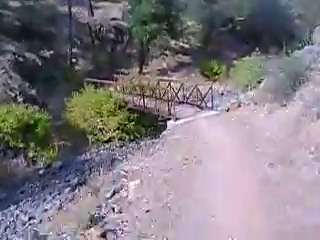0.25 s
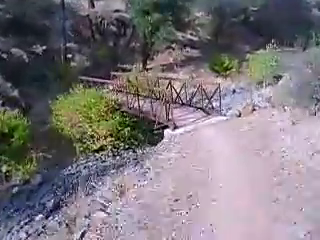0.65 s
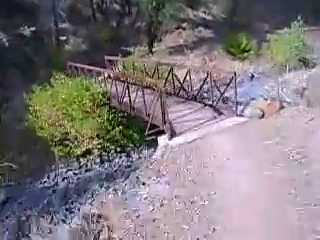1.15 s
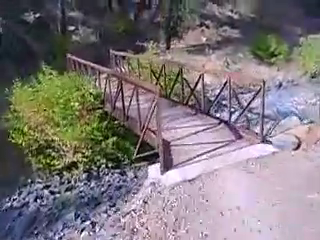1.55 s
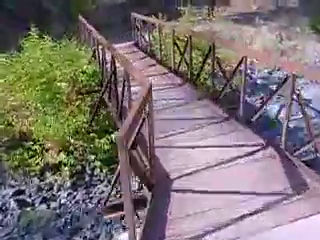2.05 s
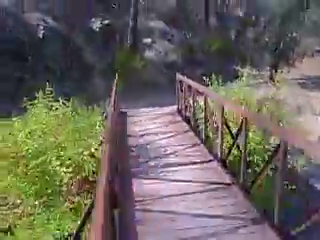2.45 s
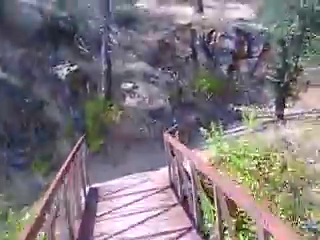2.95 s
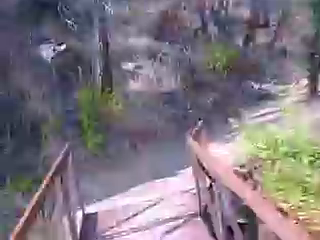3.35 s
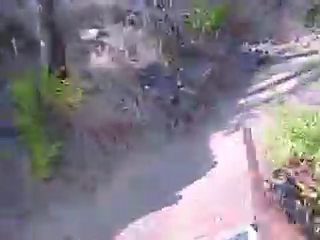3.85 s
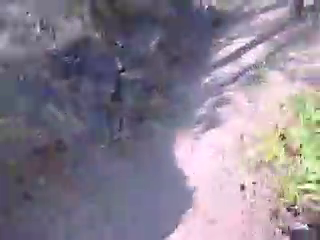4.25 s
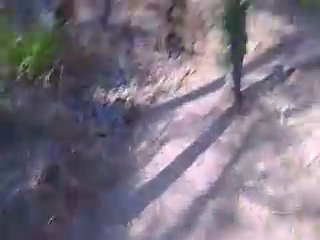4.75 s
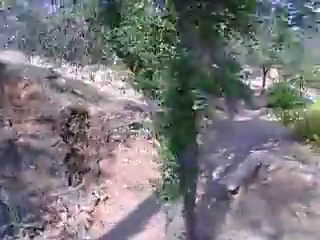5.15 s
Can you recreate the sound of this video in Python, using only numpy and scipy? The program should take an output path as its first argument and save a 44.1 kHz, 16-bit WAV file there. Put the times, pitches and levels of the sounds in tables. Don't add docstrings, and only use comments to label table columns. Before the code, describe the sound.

A bike rolls down a gravel trail with a brief brake moan, booms and rattles over a plank footbridge, then returns to dirt, all in buffeting wind.

```python
import sys
import numpy as np
from scipy import signal
from scipy.fft import rfft, irfft, next_fast_len
from scipy.io import wavfile
from scipy.ndimage import uniform_filter1d

SR = 44100
rng = np.random.default_rng(int(sys.argv[2]) if len(sys.argv) > 2 else 0)


def ratio(d):
    e = np.asarray(d, float) / 20
    return 10 ** e


def file_out(sig):
    cols = np.atleast_2d(sig).T
    lim = np.clip(cols, -1, 1)
    pcm = np.round(lim * 32767).astype(np.int16)
    wavfile.write(sys.argv[1], SR, pcm)


N = 238882

# t/s, frame shaking level/dB, tyre load level/dB, air at the port level/dB
RIDE = [(0.0, -24.5, -26.5, -25), (0.36, -25.5, -26.5, -25), (1.18, -30, -25.5, -26.5),
        (1.61, -29.5, -26.5, -24.5), (1.95, -27, -21.5, -24), (2.11, -23.5, -20, -25),
        (2.37, -22, -21, -26), (2.61, -15, -19, -19), (2.76, -14, -19, -23), (2.99, -20, -19.5, -18),
        (3.21, -15.5, -23, -25), (3.48, -15.5, -20.5, -16), (4.03, -14.5, -16, -21.5),
        (4.16, -19, -17.5, -23.5), (4.54, -18.5, -20.5, -26.5), (4.8, -18, -21, -24.5),
        (5.19, -26, -21.5, -25.5), (5.42, -20.5, -24.5, -27)]
# t/s, swell level/dB
RUTS = [(.26, 1.5), (.5, 3), (.59, 3), (.72, 0), (.95, -1.5), (1.09, 4.5), (1.3, 3.5), (1.7, 6.5),
        (1.98, 2), (2.12, 1), (2.63, 3), (2.73, 0), (2.86, 7.5), (3.07, 1.5), (3.18, 2), (3.36, -0.5),
        (3.5, 6.5), (3.73, -1), (3.83, -0.5), (3.94, 0.5), (4.08, 5.5), (4.17, 4.5), (4.29, 1), (4.02, -2),
        (4.38, 5.5), (4.53, 1), (4.66, 5), (4.79, 1.5), (5.28, 3), (5.34, 3), (2.05, 0.5)]
# t/s, peak level/dB, ring f/Hz
STONE_BUMPS = [(0.49, -11, 313), (0.74, -25, 651), (1.088, -8, 457), (1.21, -5.5, 305), (1.445, -14, 545),
               (1.555, -15.5, 358), (1.673, -7.5, 290), (1.922, -12.5, 328), (1.978, -3, 371),
               (2.244, -15.5, 358), (2.358, 0.5, 300), (4.39, 0.5, 383), (4.985, -4.5, 322),
               (5.286, -5, 450)]
# t/s, splatter level/dB
HARD_BLOWS = [(2.5829, -45), (2.6178, -30), (2.636, -31), (2.7061, -39), (2.7311, -35), (2.7358, -33),
              (2.8144, -45), (2.8568, -33), (2.8655, -30), (2.8705, -31), (2.886, -32), (3.0655, -30),
              (3.0678, -28), (3.1781, -39), (3.1888, -33), (3.2369, -27), (3.254, -37), (3.4549, -33),
              (3.5153, -37), (3.7109, -43), (3.7336, -43), (3.7607, -29), (3.9423, -33), (3.9787, -43),
              (4.0271, -31), (4.0445, -42), (4.091, -30), (4.1444, -36), (4.1783, -42), (4.1935, -42),
              (4.6402, -33),
    (4.6836, -44),
    (4.7934, -32),
]
# t/s, level/dB, f/Hz, t60/s
CHAIN_SLAPS = [(2.632, -5, 385, 0.11), (2.648, -10.5, 540, .09), (2.457, -10.5, 1205, .07),
               (3.512, -13, 3100, .04), (2.924, -12.5, 2250, 0.024), (3.063, -8.5, 2024, 0.079),
               (3.068, -9, 1320, 0.099), (3.077, -9.5, 1560, 0.057), (3.085, -6, 920, 0.047),
               (3.235, -11.5, 1596, 0.067), (3.234, -18, 2170, 0.041), (3.3, -8, 123, 0.18),
               (3.48, -9, 121.6, 0.12)]
# t/s, level/dB, rise/s, t60/s
DECK_DROPS = [
    (2.44, 0.5, .002, 0.17),
    (2.639, -2, 0.0068, 0.2),
    (2.851, -13.5, 0.0073, 0.1),
]
# f/Hz, width/Hz, level/dB
DECK_MODES = [(348.2, 70, 0.5), (489, 92, -3), (667, 110, -4), (1210, 170, -6), (1994, 120, -20)]
# t/s, peak level/dB, ring f/Hz
FRAME_STONES = [(0.0606, -14.5, 1835), (0.095, -19, 1520), (0.717, -17.5, 1640), (0.744, -18.5, 1600),
                (0.802, -20.5, 2110), (0.822, -18.5, 2620), (.8498, -13, 1811), (.8839, -34, 1480),
                (1.0135, -24.5, 2120), (1.0527, -22, 2680), (1.284, -17.5, 1900), (1.3703, -28, 1680),
                (1.4755, -14, 1520), (1.511, -25, 1600), (1.5676, -20.5, 1640), (1.6518, -24, 1820),
                (1.7157, -16, 1900), (2.112, -15.5, 3270), (2.195, -13.5, 1870), (2.247, -23, 1500),
                (2.269, -19.5, 1580), (2.296, -13, 1810), (2.362, -13.5, 1830), (4.808, -13, 1970),
                (4.861, -17, 1340), (4.986, -15, 1470), (5.0972, -17.5, 1670), (5.2736, -16, 1450),
                (5.3647, -13.5, 1405)]
# t/s, peak level/dB, ring f/Hz
HOUSING_GRIT = [(.496, -22, 2930), (0.9524, -24, 3810), (1.1442, -21.5, 3170), (1.2374, -21.5, 2710),
                (1.5845, -22, 3640), (1.961, -22, 2880), (2.143, -27, 3060), (3.7966, -19, 3100),
                (3.863, -29, 3150), (4.108, -13.5, 3090), (4.561, -13, 4100), (4.6918, -16.5, 2830),
                (5.035, -24, 2500)]
# t/s, peak level/dB, ring f/Hz, crack re peak level/dB
CHAIN_KNOCKS = [(2.616, -18, 1406, -2), (2.638, -13, 1490, -1.5), (2.793, -30, 1410, -8),
                (2.824, -6.5, 1756, -6), (2.8485, -10, 1610, -11), (2.9238, -7.5, 2120, -10),
                (3.0649, -7, 1890, -13), (3.1741, -4, 1460, -15.5), (3.232, -2, 1602, -15),
                (3.283, -9, 1810, -5.5), (3.315, -31, 1500, -3), (3.4257, -15, 1640, -13),
                (3.4483, -4, 1440, -24), (3.5126, -21, 1405, 2), (3.5666, -19, 1590, -1),
                (3.6025, -20.5, 1460, 0.5), (3.712, -8, 1500, -6), (3.7606, -1.5, 1464, -12),
                (3.83, -6.5, 1522, -9), (3.9, -18, 1860, -5), (3.943, -20.5, 1570, 2.5),
                (3.9815, -9.5, 1650, -8.5), (4.168, -15.5, 1460, -13), (4.319, -14, 1760, -18),
                (4.35, -14, 1360, -5), (4.3895, -11.5, 1390, -8), (4.459, -21, 1590, 1),
                (4.5386, -19, 1790, 1), (4.6402, -12, 1906, -13.5), (4.6922, -18, 1335, -4)]
# t/s, length/s, level/dB
BRAKE_GRIPS = [
    (.16, .11, -19),
    (.302, .09, -21.5),
    (.472, .045, -23),
    (.585, .065, -24.5),
]
# t/s, swell level/dB
GUSTS = [(.06, 0), (.27, 4), (.51, 6.5), (.83, 3), (.96, 5.5), (1.18, 5), (1.31, 1), (1.5, 1.5),
         (1.72, 3.5), (2.0, 2), (2.21, 4), (2.5, 1.5), (2.79, 4.5), (2.88, 2), (3.07, -1.5), (3.23, 2),
         (3.38, 1.5), (3.66, -2), (4.05, 0.5), (4.22, 3.5), (4.67, 3), (4.8, -1), (5.05, 2), (5.34, 3.5)]
# f/Hz, level/dB per Hz
TYRE_SPECTRUM = [(110, -20), (170, -4.5), (260, -0.5), (360, -1), (480, -5), (650, -8.5), (900, -19.5)]
# f/Hz, level/dB per Hz
TREAD_SPECTRUM = [(450, -4.5), (650, -1.5), (850, 2), (1000, 0.5), (1250, -7), (1700, -35.5), (2300, -20)]
# f/Hz, level/dB per Hz
RATTLE_SPECTRUM = [(1000, -11.5), (1500, 4), (2100, -2.5), (2900, -7.5), (4000, -15.5), (5500, -16)]
# f/Hz, level/dB per Hz
GRAVEL_SPECTRUM = [(1500, -10.5), (2500, -1), (4000, -1), (5500, -1.5)]
# f/Hz, level/dB per Hz
WIND_SPECTRUM = [(45, -20.5), (70, -5.5), (100, -2.5), (130, -3), (165, -4.5), (230, -13), (400, -34)]
# f/Hz, level/dB per Hz
BUFFET_SPECTRUM = [(12, -24), (22, -4), (40, -4), (60, -0.5), (85, -7.5), (120, -23.5)]

CRUISE_DB, TYRE_DB, TREAD_DB, RATTLE_DB, CRACKLE_DB = -22, 2.5, -23, -32.5, -38.5
TREAD_FOLLOWS, RATTLE_FOLLOWS, TYRE_FEELS_RUT, RATTLE_FEELS_RUT = 1.13, 0.87, 0.52, 0.81
RUT_RISE_S, RUT_FALL_S = 0.01, 0.032
BLOW_S, BLOW_LONGER_S_PER_DB = .00018, .0000042
STONE_T60_S, CHAIN_T60_S, GRIT_T60_S, STONE_CRACK_DB, GRIT_CRACK_DB = 0.032, .033, 0.025, -6, -4
BRAKE_HZ, SETTLE_HZ, SETTLE_S = 889, 799, 0.27
GRIP_DB_PER_S, SLIP_DB_PER_S, LET_GO_DB_PER_S = 1200, 58.5, 701
UPPER_HZ, UPPER_DB, UPPER_FROM_S, UPPER_LENGTH_S = 1075, -28, .18, 0.144
WIND_DB, BUFFET_DB, GUST_S = -1.5, -6.5, .045
PAD_TOP, SENSOR_TOP, FINAL_TOP = .61, .695, .712
BAND_HZ, STUMBLE, DEAD_ZONE = 5470, .42, .2


def tyres(load_db, rut_db):
    drumming = coloured(grains(500, 10.5, 0.8, 0.48, 17), TYRE_SPECTRUM)
    return ratio(TYRE_DB + load_db + TYRE_FEELS_RUT * rut_db) * drumming


def tread_and_frame(rough_db, rut_db):
    jolts = grains(900, 3.77, 0.51, 0.61, 40)
    tread = ratio(TREAD_DB + TREAD_FOLLOWS * rough_db + rut_db) * coloured(jolts, TREAD_SPECTRUM)
    rattle = coloured(jolts * ratio(2.0 * drift(55)), RATTLE_SPECTRUM)
    return tread + ratio(RATTLE_DB + RATTLE_FOLLOWS * rough_db + RATTLE_FEELS_RUT * rut_db) * rattle


def gravel(rough_db, rut_db):
    snaps = coloured(grains(400, 3.0, .05, 3.4, 25), GRAVEL_SPECTRUM)
    return ratio(CRACKLE_DB + RATTLE_FOLLOWS * rough_db + RATTLE_FEELS_RUT * rut_db) * snaps


def thuds(shaking):
    out = shaking.copy()
    for s, db, hz in STONE_BUMPS:
        ping(out, s, db - 4.5, hz, 9.0 / hz)
    for s, db, hz, t60 in CHAIN_SLAPS:
        ping(out, s, db, hz, t60)
    near = np.arange(-18, 19)
    fade = np.hanning(len(near)) ** .2
    for s, splatter_db in HARD_BLOWS:
        at = 4 * round((s + .0006) * SR / 4)
        half = SR * (BLOW_S - BLOW_LONGER_S_PER_DB * (splatter_db + 27))
        swing = np.sign(out[at]) * np.cos(np.pi / 2 * np.clip(near / half, -1, 1)) ** 2
        out[at + near] += fade * (swing - out[at + near])
    return out


def deck_drops():
    t, shake = np.arange(N) / SR, 0
    for s, db, rise, t60 in DECK_DROPS:
        late = np.maximum(t - s, 0)
        decay_db = 60 * np.maximum(late - rise - .012, 0) / t60
        shake = shake + ratio(db - decay_db) * np.minimum(late / rise, 1)
    white, deck = rng.standard_normal(N), 0
    for k, (hz, width, db) in enumerate(DECK_MODES):
        r = np.exp(-np.pi * width / SR)
        poles = [1, -2 * r * np.cos(2 * np.pi * hz / SR), r * r]
        mode = rms_one(signal.lfilter([1, 0, -1], poles, white))
        deck = deck + (-1) ** k * ratio(db) * mode
    return shake * rms_one(deck)


def ticks():
    strikes = [(*row, STONE_T60_S, STONE_CRACK_DB) for row in FRAME_STONES]
    strikes += [(*row, GRIT_T60_S, GRIT_CRACK_DB) for row in HOUSING_GRIT]
    strikes += [(s, db, hz, CHAIN_T60_S, crack_db) for s, db, hz, crack_db in CHAIN_KNOCKS]
    rings, cracks = np.zeros(N), np.zeros(N)
    for s, db, hz, t60, crack_db in strikes:
        ping(rings, s, db - 7.0, hz, t60)
        cracks[round(s * SR)] = ratio(db + crack_db)
    r = ratio(-60 / (0.034 * SR))
    grit = coloured(rng.standard_normal(N), RATTLE_SPECTRUM)
    return rings + grit * signal.lfilter([1], [1, -r], cracks)


def brake():
    s = np.arange(.12, .72, .004)
    hz = SETTLE_HZ + (BRAKE_HZ - SETTLE_HZ) * np.exp(-(s - BRAKE_GRIPS[0][0]) / SETTLE_S)
    lower = np.transpose([s, hz, np.max([held(s, *row) for row in BRAKE_GRIPS], axis=0)])
    upper = np.transpose([s, UPPER_HZ + 0 * s, held(s, UPPER_FROM_S, UPPER_LENGTH_S, UPPER_DB)])
    return moan(lower, 4.0, 1.2) + moan(upper, 8.3, 1.1)


def held(s, start, length, db):
    late = s - start
    release_db = -SLIP_DB_PER_S * late - LET_GO_DB_PER_S * np.maximum(late - length, 0)
    return db + np.minimum(GRIP_DB_PER_S * late, release_db)


def moan(rows, wobble_hz, flutter_db):
    hz, db = in_time(rows)
    s = np.arange(N) / SR
    tone = np.sin(2 * np.pi * np.cumsum(hz + wobble_hz * drift(33)) / SR)
    sounding = (s > rows[0][0]) & (s < rows[-1][0])
    return np.sqrt(2) * ratio(db + flutter_db * drift(25)) * tone * sounding


def wind(air_db):
    air_db = air_db + swells(GUSTS, GUST_S, GUST_S)
    roar = evened(coloured(grains(300, 3.8, .9, 0.7, 44), WIND_SPECTRUM), .07, 0.76)
    buffet = coloured(rng.standard_normal(N), BUFFET_SPECTRUM)
    return ratio(air_db + WIND_DB) * roar + ratio(air_db + BUFFET_DB) * buffet


def ping(out, s, db, hz, t60):
    start = round(s * SR)
    t = np.arange(min(round(.25 * SR), N - start)) / SR
    wave = ratio(db - 60 * t / max(t60, .004)) * np.sin(2 * np.pi * hz * t)
    np.add.at(out, start + np.arange(len(t)), wave)


def grains(per_s, spread_db, smooth, lumpy_db, lump_rate):
    born = rng.random(N) < per_s / SR
    sizes = ratio(spread_db * np.minimum(rng.exponential(1, N), 4)) * rng.choice([-1, 1], N)
    share = np.clip(smooth, 0, 1)
    mix = np.sqrt(1 - share) * rms_one(born * sizes) + np.sqrt(share) * rng.standard_normal(N)
    return mix * ratio(lumpy_db * drift(lump_rate))


def coloured(x, spectrum):
    hz, db = np.transpose(spectrum)
    size = next_fast_len(N)
    grid = np.maximum(np.arange(size // 2 + 1) * SR / size, 1)
    gain = ratio(np.interp(np.log(grid), np.log(hz), db, left=-80, right=-80))
    return rms_one(irfft(rfft(x, size) * gain, size)[:N])


def evened(x, span_s, strength):
    power = uniform_filter1d(x ** 2, round(span_s * SR))
    return rms_one(x / (power + 1e-3) ** (strength / 2))


def swells(rows, rise_s, fall_s):
    late = np.arange(0, N, 40) / SR - np.array(rows)[:, :1]
    db = np.array(rows)[:, 1:] * np.exp(-(late / np.where(late < 0, rise_s, fall_s)) ** 2)
    return np.interp(np.arange(N) / 40, np.arange(db.shape[1]), db.sum(axis=0))


def drift(rate):
    r = np.exp(-20 * np.pi * rate / SR)
    slow = signal.lfilter([1], [1, -2 * r, r * r], rng.standard_normal(N // 10 + 4002))[4000:]
    return np.interp(np.arange(N) / 10, np.arange(len(slow)), rms_one(slow))


def in_time(rows):
    s, *columns = np.transpose(rows)
    return [np.interp(np.arange(N) / SR, s, c) for c in columns]


def rms_one(x):
    return x / np.sqrt(np.mean(x ** 2) + 1e-20)


def scene():
    shaking_db, load_db, air_db = in_time(RIDE)
    rough_db = shaking_db - CRUISE_DB
    rut_db = swells(RUTS, RUT_RISE_S, RUT_FALL_S)
    rolling = tyres(load_db, rut_db) + tread_and_frame(rough_db, rut_db) + gravel(rough_db, rut_db)
    steady = rolling + brake() + wind(air_db)
    steady = steady / (1 + (steady / PAD_TOP) ** 6) ** (1 / 6)
    return thuds(steady + deck_drops() + ticks())[None]


def low_pass(x):
    return signal.sosfilt(signal.butter(12, 15830, fs=SR, output="sos"), x)


def record(dry):
    slow = np.clip(dry[0, 2::4], -SENSOR_TOP, SENSOR_TOP)
    crossed = np.sign(slow) != np.sign(np.roll(slow, 1))
    dropped = (crossed | np.roll(crossed, -1)) & (rng.random(len(slow)) < STUMBLE)
    dropped |= slow ** 2 < DEAD_ZONE ** 2 * uniform_filter1d(slow ** 2, size=16)
    stuffed = np.zeros(N)
    stuffed[2::4] = 4 * slow * ~dropped
    band = signal.firwin(129, BAND_HZ, window=("kaiser", 9), fs=SR)
    x = np.convolve(np.pad(stuffed, 64, "reflect"), band, "valid")[None]
    return low_pass(np.clip(x, -FINAL_TOP, FINAL_TOP))


dry = scene()
out = record(dry)
file_out(out)
```